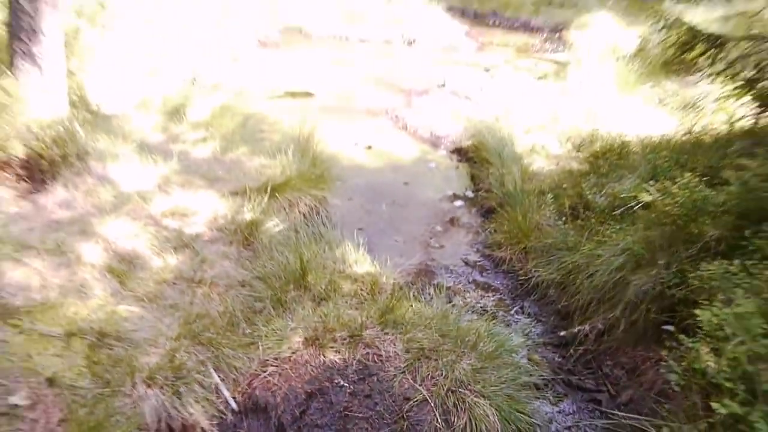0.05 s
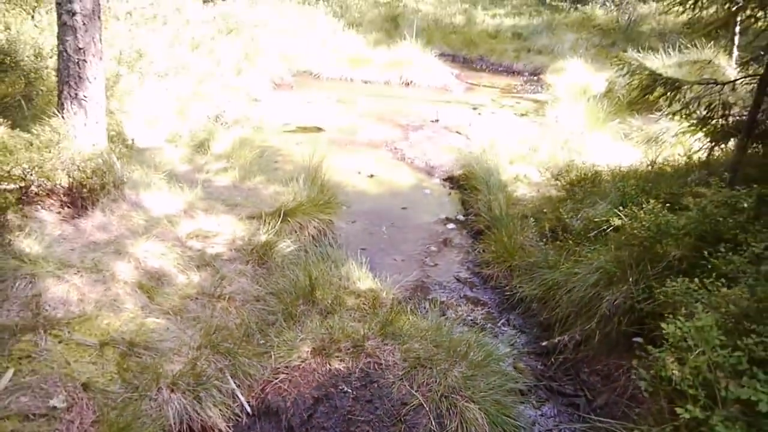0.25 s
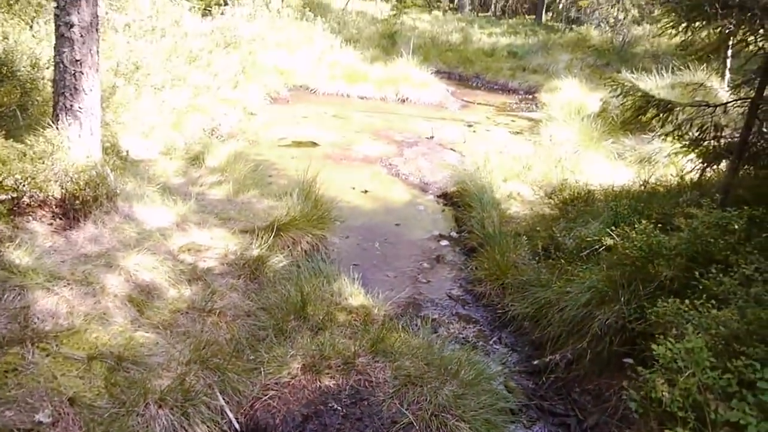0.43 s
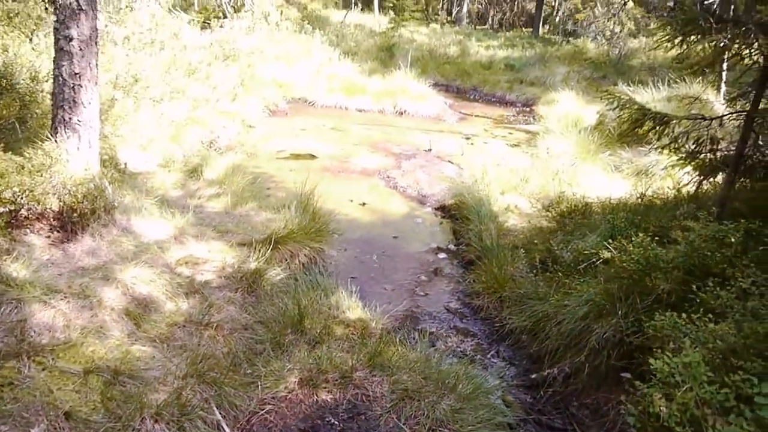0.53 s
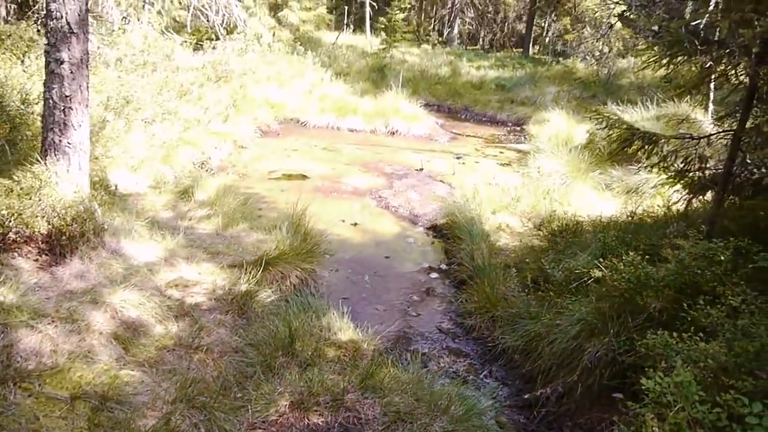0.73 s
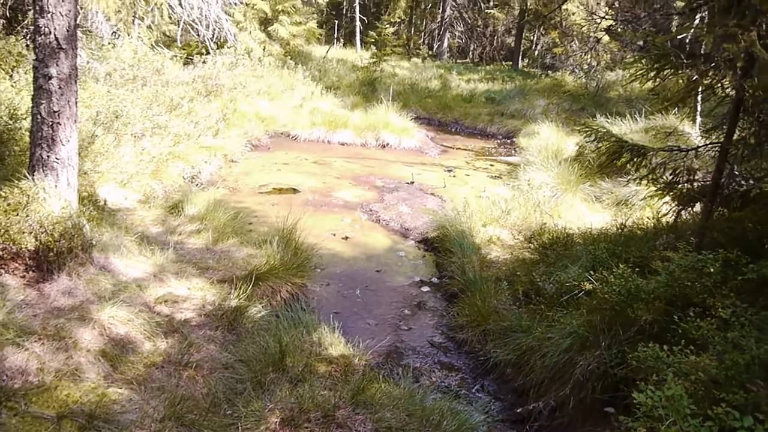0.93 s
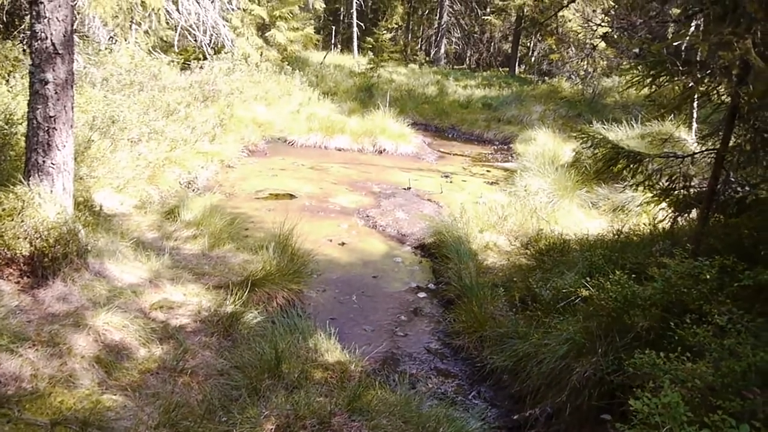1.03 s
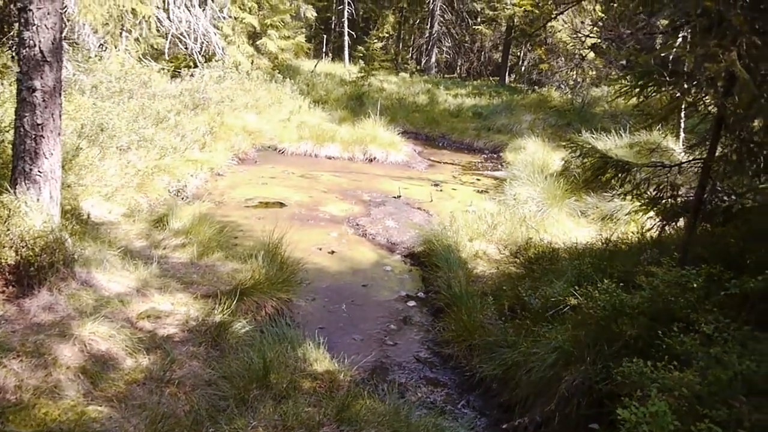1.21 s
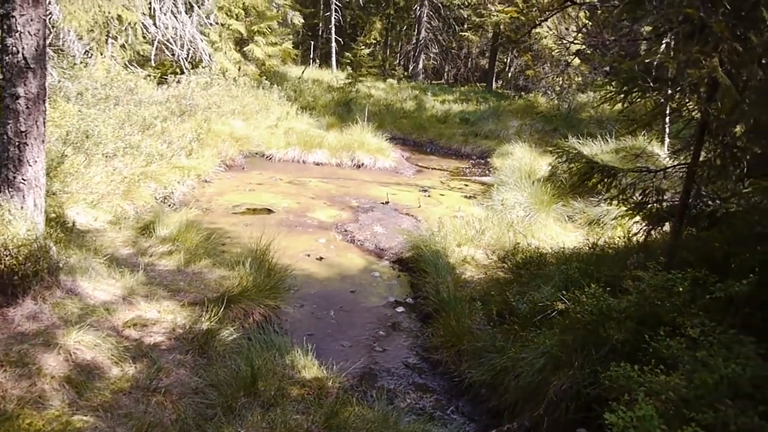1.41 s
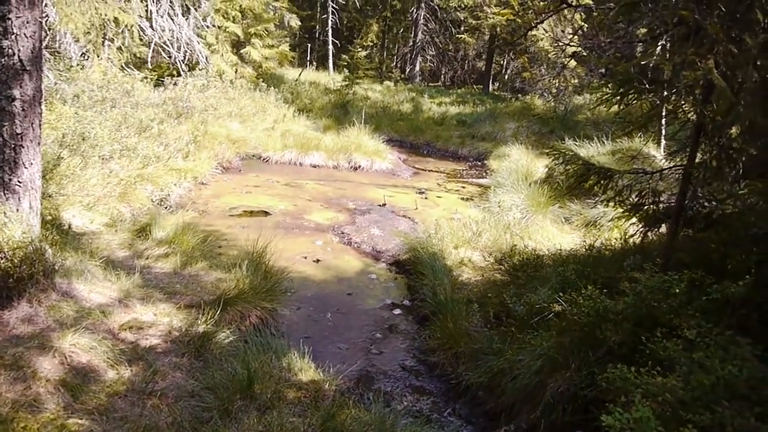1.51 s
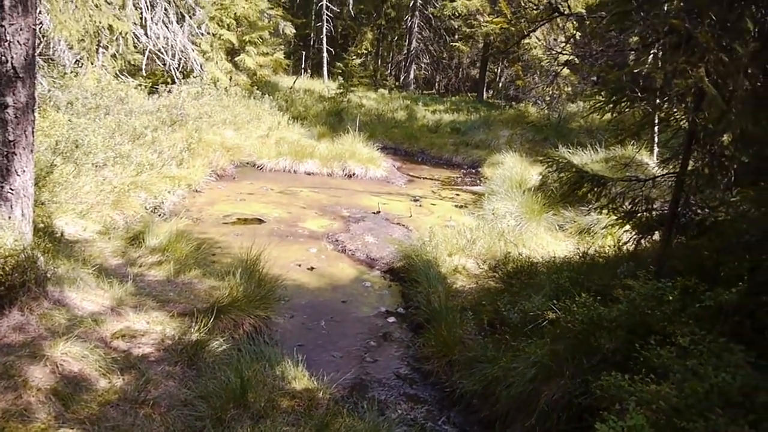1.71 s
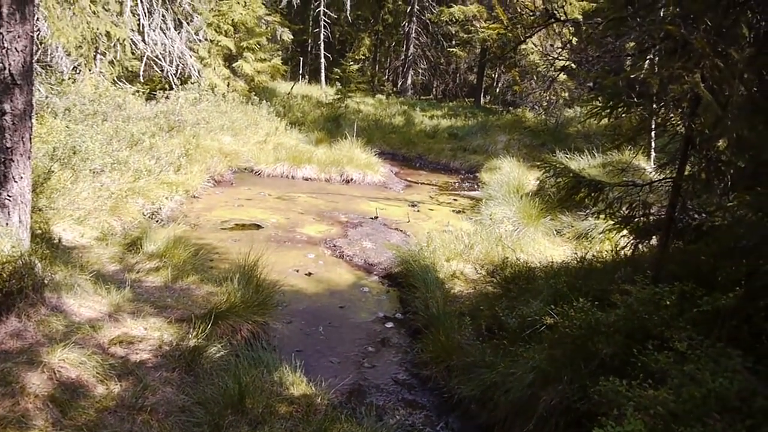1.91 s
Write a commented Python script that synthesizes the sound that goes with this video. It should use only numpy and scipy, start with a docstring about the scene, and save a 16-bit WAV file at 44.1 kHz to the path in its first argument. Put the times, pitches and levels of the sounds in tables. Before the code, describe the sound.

A muddy pool bubbles softly, one close plop followed by small scattered pops.

```python
"""Wet mud gurgles without pause in a forest bog, with a faint hiss, small pops and tiny high ticks.
Gas is bubbling up through a pool: each bubble opens and rings briefly, rising in pitch.
Almost at once one big bubble plops close by. Smaller ones keep popping, mostly to the left,
and some burst with a spatter or a fine spray. Banks and trees add a short echo."""
import sys
import numpy as np
from scipy import signal
from scipy.fft import rfft, irfft, next_fast_len
from scipy.io import wavfile

SR = 44100
rng = np.random.default_rng(int(sys.argv[2]) if len(sys.argv) > 2 else 0)


def waveform_to_disk(signal):
    """Save audio, clipped to [-1, 1], as 16-bit WAV at the path in sys.argv[1]."""
    frames = np.transpose(np.atleast_2d(signal))
    scaled = np.clip(frames, -1, 1) * 32767
    samples = np.round(scaled).astype(np.int16)
    wavfile.write(sys.argv[1], SR, samples)


N = 85995
TIME_S = np.arange(N) / SR
LAG_S_PER_DB = 1.1e-5
POP_RISE_PER_S, SHARP_ATTACK_S = 8.2, .0004


def undb(db):
    """Turn decibels into a number to multiply by."""
    return 10 ** (np.asarray(db) / 20)


def level(x, db):
    """Set a sound's average (rms) level."""
    return x * undb(db) / np.sqrt(np.mean(x ** 2))


def colour(x, points):
    """Shape a sound's tone along (pitch [Hz], level [dB]) points."""
    size = next_fast_len(x.shape[-1] + 2048) * 2
    hz, db = np.array(points, float).T
    bin_hz = np.maximum(np.arange(size // 2 + 1) * SR / size, 1)
    gain = undb(np.interp(np.log(bin_hz), np.log(hz), db))
    cepstrum = irfft(np.log(gain))
    # fold it so that the filter never rings before the sound starts
    cepstrum[1:size // 2] *= 2
    cepstrum[size // 2 + 1:] = 0
    return irfft(rfft(x, size) * np.exp(rfft(cepstrum)), size)[..., :x.shape[-1]]


def add(out, sound, start, db, pan_db):
    """Mix a sound in. Pan is left minus right level; the nearer ear hears it louder and sooner."""
    for channel, side_db in enumerate((pan_db / 2, -pan_db / 2)):
        i = max(int(round((start - side_db * LAG_S_PER_DB) * SR)), 0)
        part = sound[:max(N - i, 0)]
        out[channel, i:i + len(part)] += part * undb(db + side_db)


def ring(hz, fade_s, attack_s, rise_per_s=0):
    """A bubble's note swells, then drops 60 dB in fade_s. Its pitch can climb as the bubble opens."""
    t = np.arange(int((fade_s + attack_s) * SR) + 2) / SR
    swell = np.sin(np.pi / 2 * np.minimum(t / attack_s, 1)) ** 2
    fade = undb(-60 * np.maximum(t - attack_s, 0) / fade_s)
    return swell * fade * np.sin(2 * np.pi * hz * (t + rise_per_s * t ** 2 / 2))


def fading_noise(fade_s, tone):
    """A puff of noise that drops 60 dB in fade_s."""
    t = np.arange(int(fade_s * SR) + 512) / SR
    noise = colour(rng.standard_normal(len(t)), tone)
    return level(noise, 0) * undb(-60 * t / fade_s)


# tone of the air that both ears share (pitch [Hz], level [dB])
AIR_SHARED_TONE = [(25, -3), (70, -6), (150, 3), (500, 10.5), (1400, 7.5), (2500, -.5), (4500, -2.2),
                   (7000, -2.3), (10000, -5.3), (15500, -10)]
# tone of the air that differs between the ears (pitch [Hz], level [dB])
AIR_SIDE_TONE = [(25, -4), (70, -9), (150, -7.5), (500, 5.5), (1400, 6), (2500, 3), (4500, 2), (7000, -0.5),
                 (10000, -2.5), (15500, -6)]
def forest_air(db=-60.5, pan_db=1.2, settle_s=.4):
    """The air makes a faint, wide hiss, a little stronger at first."""
    shared = level(colour(rng.standard_normal(N), AIR_SHARED_TONE), db)
    side = level(colour(rng.standard_normal(N), AIR_SIDE_TONE), db)
    early_db = 1.2 * np.exp(-TIME_S / settle_s)
    ear_db = np.array([[pan_db], [-pan_db]]) / 2
    return np.array([shared + side, shared - side]) * undb(early_db + ear_db)


# tone shaping of the gurgling mud (pitch [Hz], level [dB])
GURGLE_TONE = [(60, -41), (110, -22.5), (170, -14.5), (250, -9), (330, 0), (420, -2.5), (600, -1),
               (800, -6.5), (1100, -12.5), (1500, -15), (2100, -27), (4000, -28.5), (9000, -65)]
# ringing hollows in the bank (pitch [Hz], width [Hz], level [dB])
BANK_HOLLOWS = [(329.4, 24, -10), (452, 22, -10), (602, 32, -7)]
def gurgle(bubbles_per_s=2400, fade_db_per_s=.7):
    """Countless bubbles of every size open at random and make the hollows of the bank ring."""
    out = np.zeros((2, N))
    count = int(bubbles_per_s * N / SR)
    chance = rng.random((count, 2))
    spread = np.clip(rng.standard_normal((count, 2)), -2, 2)
    for (when, height), (strength, place) in zip(chance, spread):
        hz = 130 * 2 ** (5 * height)  # anywhere in five octaves
        note = hz * ring(hz, fade_s=12 / hz, attack_s=1 / hz, rise_per_s=3)
        add(out, note, when * N / SR, db=1.8 * strength, pan_db=-.3 + 2 * place)
    mud = colour(out, GURGLE_TONE)
    hollows = sum(undb(db) * signal.lfilter(*signal.iirpeak(hz, hz / width, SR), mud)
                  for hz, width, db in BANK_HOLLOWS)
    return level((mud + hollows) * undb(-fade_db_per_s * TIME_S), db=-53)


# tone of a squelch (distance from the bubble's pitch [octaves], level [dB])
SQUELCH_TONE = [(-2, -32), (-.7, -10), (-.25, 0), (.25, -1), (.6, -16), (1.6, -42)]
def squelch(hz):
    """Wet mud slumps into an opened bubble: a brief rustle around its pitch."""
    tone = [(hz * 2 ** octaves, db) for octaves, db in SQUELCH_TONE]
    return fading_noise(fade_s=.04, tone=tone)


# small bubbles (time [s], pitch [Hz], level [dB], fade [s], squelch level [dB], pan [dB])
SMALL_BUBBLES = [(.001, 1000, -42, .024, -56, 4), (.2410, 547, -31, .011, -60, 0),
                 (.2424, 1460, -38.5, .015, -54, 4), (.2503, 520, -39, .016, -60, -3),
                 (.2553, 1400, -41, .008, -54, 5), (.4605, 1450, -45, .006, -55, 4),
                 (.4695, 480, -44, .012, -60, 0), (.5068, 486, -41, .012, -60, -3),
                 (.6051, 1477, -33.5, .011, -52, 5.5), (.6135, 1400, -41.5, .014, -55, 2),
                 (.6203, 1830, -37.5, .007, -57, 8), (.63, 2600, -44, .01, -57, 11),
                 (.6568, 1320, -43, .011, -58, 2), (.668, 600, -44, .025, -60, -1),
                 (.759, 314, -42, .034, -60, 0), (.9099, 1480, -33, .004, -56, 6.5),
                 (.9182, 2010, -50, .007, -61, 10), (.9350, 830, -39, .009, -56, 3),
                 (1.1182, 1270, -37, .007, -58, 6), (1.1293, 1750, -39.5, .006, -52, 12),
                 (1.1367, 1900, -43.5, .007, -54, 5), (1.1753, 3320, -51, .014, -62, 9),
                 (1.4221, 2220, -44.5, .016, -62, 14), (1.4648, 3270, -44, .008, -61, 13),
                 (1.5355, 620, -42, .024, -60, 0), (1.638, 660, -44, .016, -56, 0),
                 (1.7060, 720, -40, .01, -57, 0), (1.867, 650, -44, .02, -60, 0),
                 (1.938, 1520, -47, .03, -51, 6)]
def pops():
    """Small bubbles open, each with a rising note and a squelch."""
    out = np.zeros((2, N))
    for start, hz, db, fade_s, squelch_db, pan_db in SMALL_BUBBLES:
        note = ring(hz, fade_s, attack_s=1.2 / hz, rise_per_s=POP_RISE_PER_S)
        add(out, note, start, db, pan_db)
        add(out, squelch(hz), start, squelch_db, pan_db)
    return out


def crackle(bubbles_per_s=50, low_hz=2600, high_hz=10000, fade_db_per_s=4):
    """The finest bubbles prickle at random on the wet surface, slowly getting quieter."""
    out = np.zeros((2, N))
    count = int(bubbles_per_s * N / SR)
    chance = rng.random((count, 2))
    spread = np.clip(rng.standard_normal((count, 2)), -2, 2)
    for (when, height), (strength, place) in zip(chance, spread):
        hz = low_hz * (high_hz / low_hz) ** height
        note = ring(hz, fade_s=.005, attack_s=SHARP_ATTACK_S)
        add(out, note, when * N / SR, db=-59 + 3 * strength, pan_db=4 * place)
    return out * undb(-fade_db_per_s * (TIME_S - N / SR / 2))


# tiny high ticks (time [s], level [dB], pitch [Hz], pan [dB])
HIGH_TICKS = [(.0630, -50, 6900, 0), (.0838, -48, 6800, -5), (.1235, -50, 7000, 0), (.1480, -49, 5600, 0),
              (.2855, -50, 7040, 0), (0.3163, -45, 6900, -1), (0.3478, -44, 6550, -6),
              (.3807, -43, 6500, -8.5), (.4015, -51, 6800, 3), (.4615, -45, 4400, 10),
              (.6685, -46, 5400, 6), (.6716, -50.5, 7000, 0), (0.7094, -53, 7300, 2),
              (0.9047, -47, 7200, 1), (1.0575, -54, 10700, 0), (1.1047, -46, 6940, 1),
              (1.1440, -52.5, 7600, 9), (1.199, -50, 7340, 1), (1.3341, -46.5, 6630, -1),
              (1.3793, -52.5, 7250, 3), (1.5493, -51, 7250, 1), (1.7852, -51.5, 7600, 8),
              (1.8537, -48.5, 7200, 0)]
def ticks():
    """Tiny bubbles ring so briefly that each sounds like a tick."""
    out = np.zeros((2, N))
    for start, db, hz, pan_db in HIGH_TICKS:
        add(out, ring(hz, fade_s=.0071, attack_s=SHARP_ATTACK_S), start, db, pan_db)
    return out


# tone of the big bubble's tearing skin (pitch [Hz], level [dB])
SNAP_TONE = [(60, -6), (200, -8), (600, -5), (1050, -2), (1400, -1), (2200, 0), (3200, -5.5), (4300, -6.5),
             (5200, -17), (8000, -23), (15000, -32)]
# notes of the hollow inside it (pitch [Hz], level next to the loudest [dB], fade [s])
PLOP_NOTES = [(556, 0, .039), (478, -5, .021), (295, -11.5, .026)]
def big_plop(start_s=.21555, plop_db=-17.3, pan_db=-2.2):
    """The skin of a big bubble snaps, then the opened hollow rings."""
    out = np.zeros((2, N))
    snap = fading_noise(fade_s=.015, tone=SNAP_TONE)
    add(out, snap, start=.2158, db=-34.5, pan_db=pan_db)
    for hz, db, fade_s in PLOP_NOTES:
        note = ring(hz, fade_s, attack_s=.0009, rise_per_s=7)
        wait_s = .97 / hz  # about one vibration, so the deepest note comes last
        add(out, note, start_s + wait_s, plop_db + db, pan_db)
    return out


# bursting bubbles (time [s], pitch [Hz], level [dB], spatter level [dB], pan [dB])
BURSTING_BUBBLES = [(.4598, 4300, -43, -57, 13), (.6297, 3600, -50, -56, 9), (.9349, 3100, -30.5, -54.5, 7),
                    (.9425, 3700, -47, -58, 5), (1.7065, 1150, -31.5, -57, 5), (1.7182, 1900, -43, -54, 6),
                    (1.8857, 2800, -48, -58, 13)]
# tone of the spatter (pitch [Hz], level [dB])
SPATTER_TONE = [(60, -30), (300, -14), (1200, -2), (3300, -1), (5000, -7), (9000, -13), (15000, -18)]
def bursts():
    """Some bubbles tear their skin with a sharp crack and a spatter."""
    out = np.zeros((2, N))
    for start, hz, db, spatter_db, pan_db in BURSTING_BUBBLES:
        crack = ring(hz, fade_s=.0032, attack_s=SHARP_ATTACK_S, rise_per_s=POP_RISE_PER_S)
        add(out, crack, start, db, pan_db)
        add(out, fading_noise(fade_s=.065, tone=SPATTER_TONE), start, spatter_db, pan_db / 2)
    return out


# sprays of droplets (time [s], level [dB], pan [dB])
DROPLET_SPRAYS = [(.935, -56, 3), (1.7068, -52.5, 3), (1.7215, -52, 1)]
# tone of a spray (pitch [Hz], level [dB])
SPRAY_TONE = [(1000, -20), (4500, -8), (6100, 0), (7200, -6), (8800, -5), (10200, 1), (12000, -7),
              (15500, -4)]
def sprays():
    """Fine droplets fly off with a short, crisp hiss."""
    out = np.zeros((2, N))
    for start, db, pan_db in DROPLET_SPRAYS:
        add(out, fading_noise(fade_s=.03, tone=SPRAY_TONE), start, db, pan_db)
    return out


# tone of the echo from banks and trees (pitch [Hz], level [dB])
ECHO_TONE = [(100, -32), (650, -22), (1400, 0), (3500, -2), (7000, -8), (15000, -30)]
def echo(sound, bank_db=-9.5, bank_fade_s=.08, trees_db=-20, trees_fade_s=.6):
    """Sound bounces quickly off the banks, and the trees add a weaker, longer tail."""
    out = np.zeros((2, N))
    mono = sound.mean(axis=0)
    for channel in range(2):
        for db, fade_s in ((bank_db, bank_fade_s), (trees_db, trees_fade_s)):
            tail = fading_noise(fade_s, ECHO_TONE)
            out[channel] += undb(db) * signal.fftconvolve(mono, tail / np.linalg.norm(tail))[:N]
    return out


def scene(low_cut_hz=255):
    """Single bubbles and their echo stand out over the air and the gurgle."""
    background = forest_air() + gurgle()
    bubbles = pops() + crackle() + ticks() + big_plop() + bursts() + sprays()
    # small things give off little bass
    bass_cut = signal.butter(3, low_cut_hz, "high", fs=SR, output="sos")
    bubbles = signal.sosfilt(bass_cut, bubbles)
    return background + bubbles + echo(bubbles)


def record(dry):
    """Cut away the very highest treble."""
    top_hz = 15800
    return signal.sosfilt(signal.ellip(10, .2, 70, top_hz, fs=SR, output="sos"), dry)


dry = scene()
out = record(dry)
waveform_to_disk(out)
```